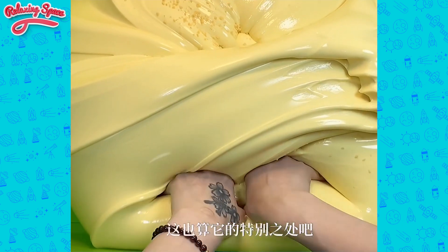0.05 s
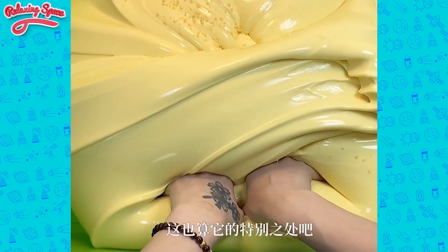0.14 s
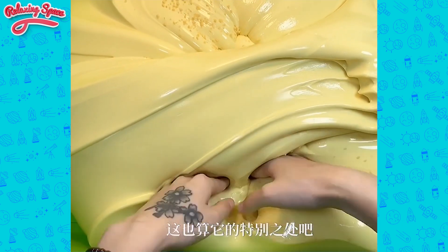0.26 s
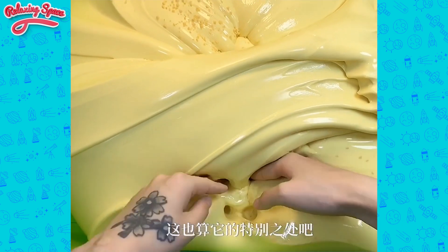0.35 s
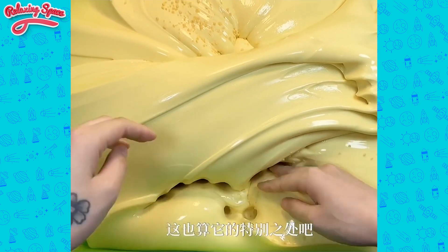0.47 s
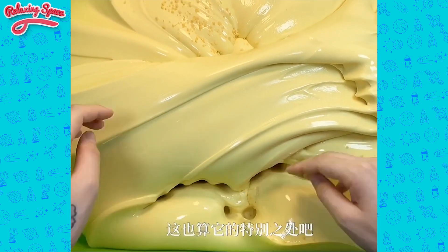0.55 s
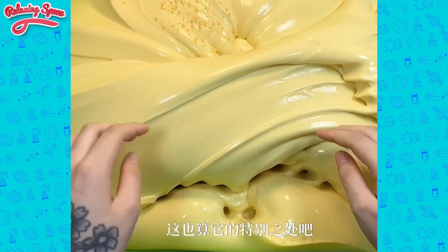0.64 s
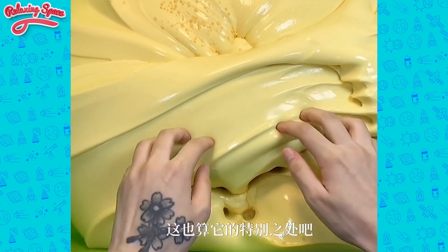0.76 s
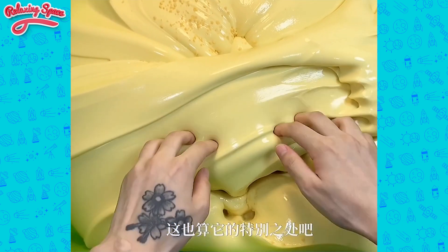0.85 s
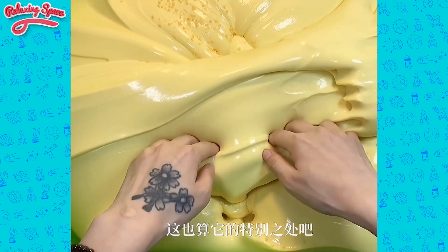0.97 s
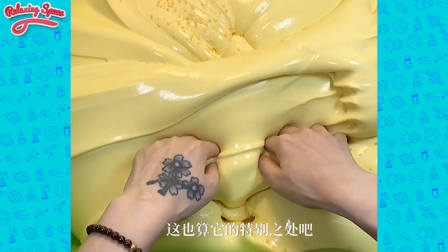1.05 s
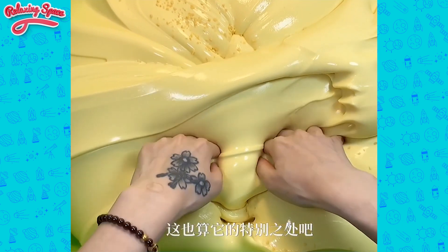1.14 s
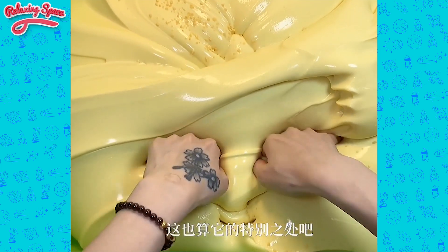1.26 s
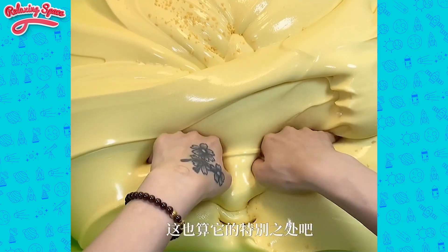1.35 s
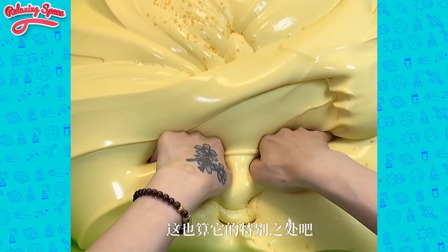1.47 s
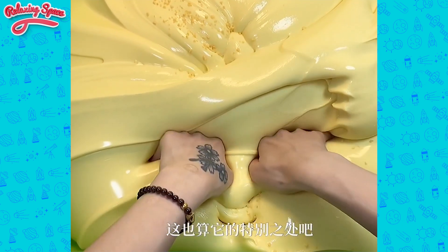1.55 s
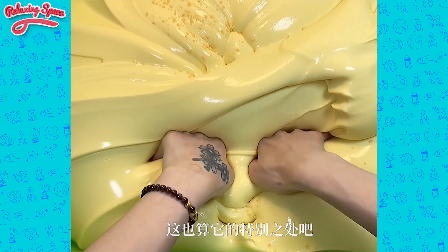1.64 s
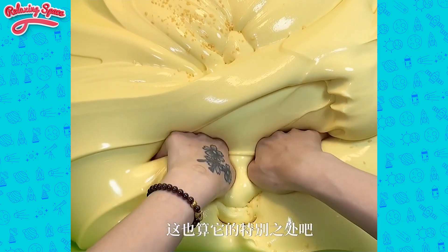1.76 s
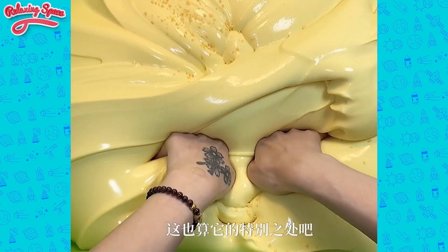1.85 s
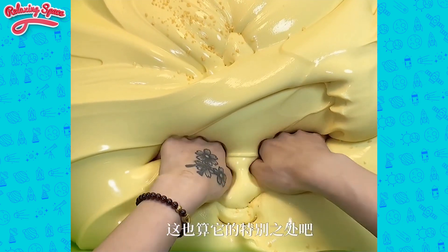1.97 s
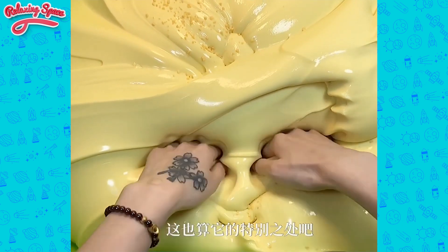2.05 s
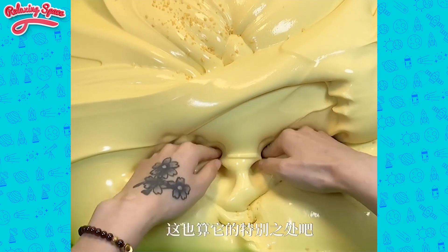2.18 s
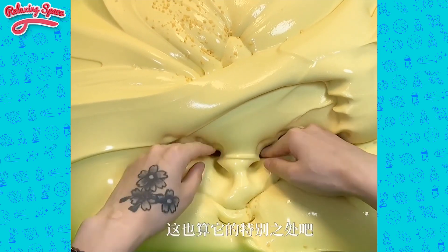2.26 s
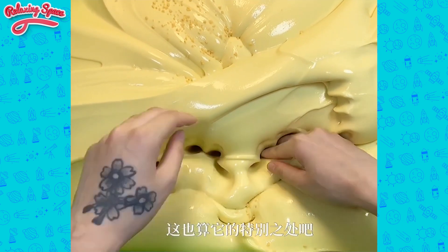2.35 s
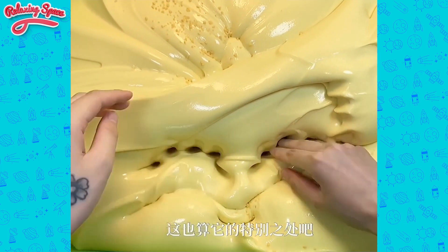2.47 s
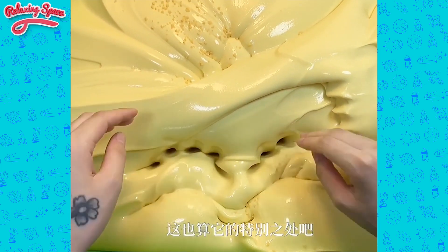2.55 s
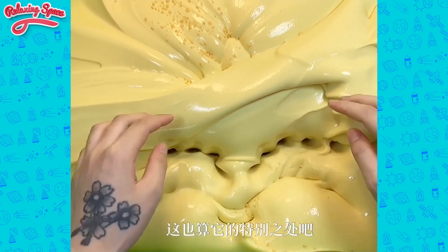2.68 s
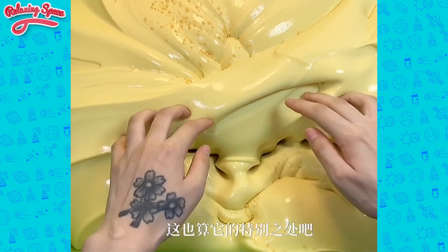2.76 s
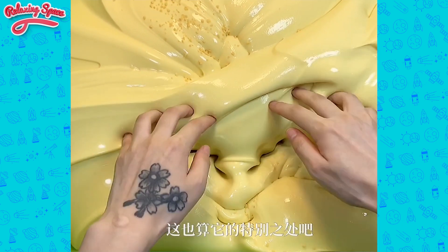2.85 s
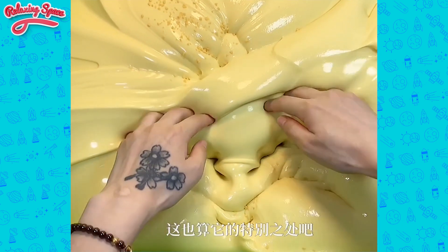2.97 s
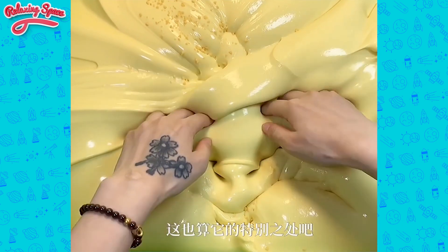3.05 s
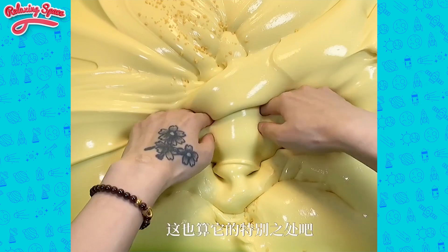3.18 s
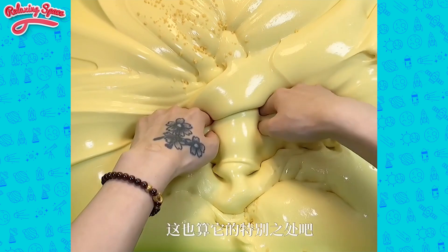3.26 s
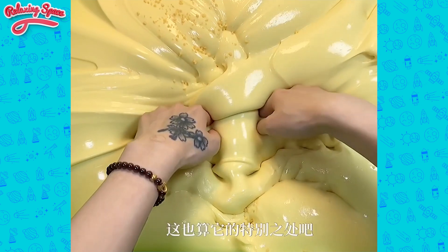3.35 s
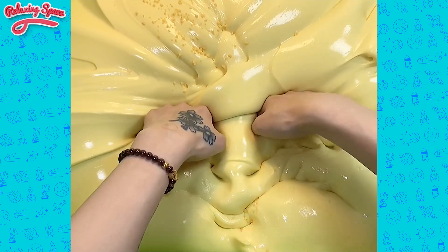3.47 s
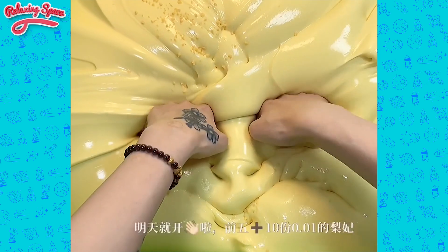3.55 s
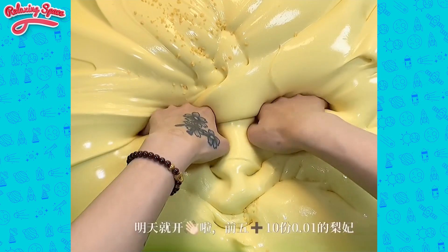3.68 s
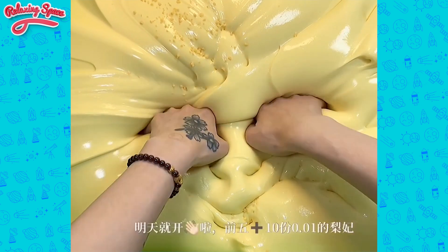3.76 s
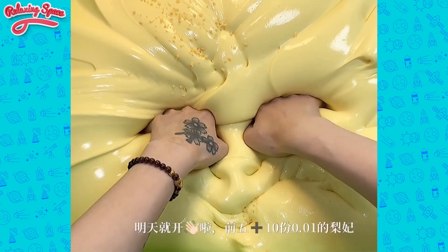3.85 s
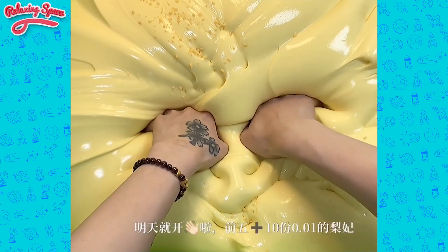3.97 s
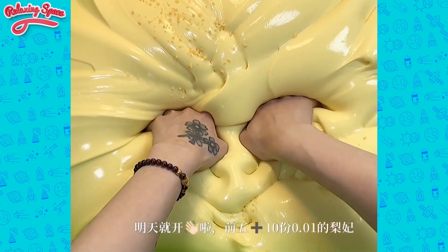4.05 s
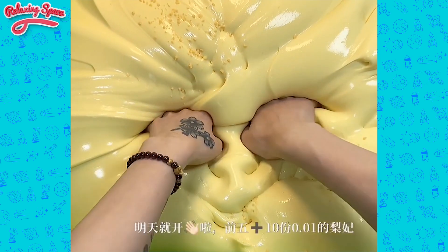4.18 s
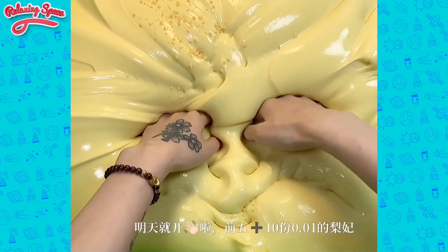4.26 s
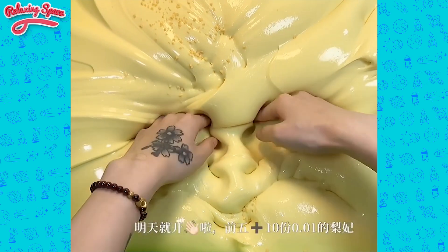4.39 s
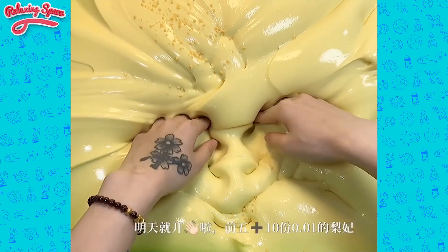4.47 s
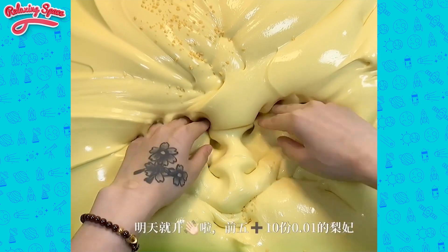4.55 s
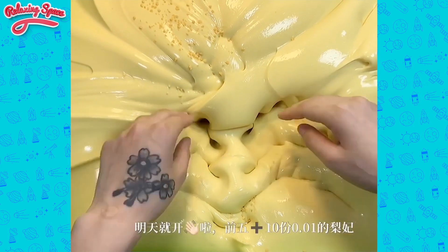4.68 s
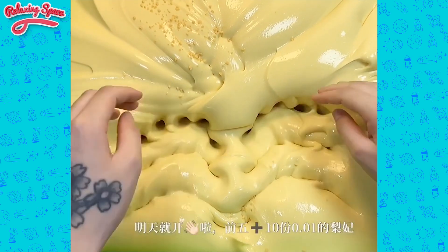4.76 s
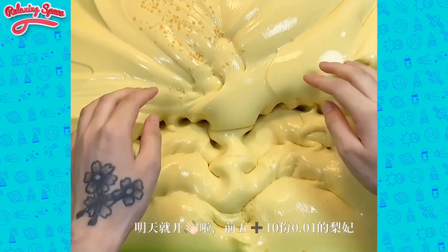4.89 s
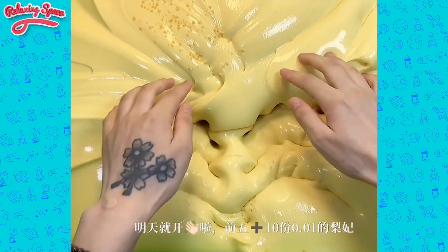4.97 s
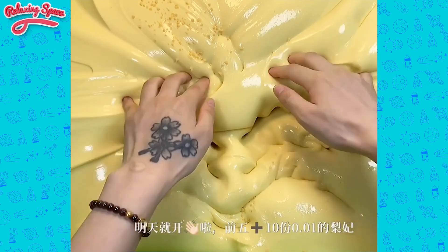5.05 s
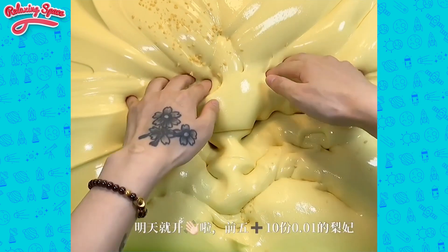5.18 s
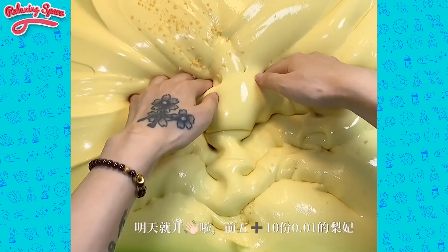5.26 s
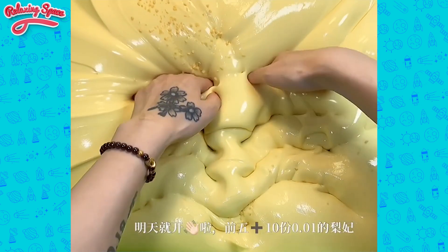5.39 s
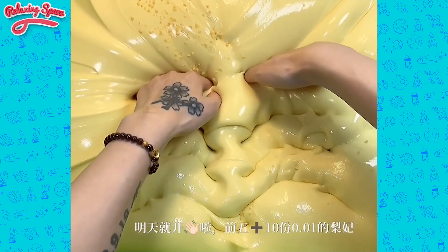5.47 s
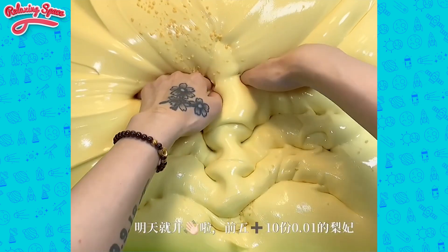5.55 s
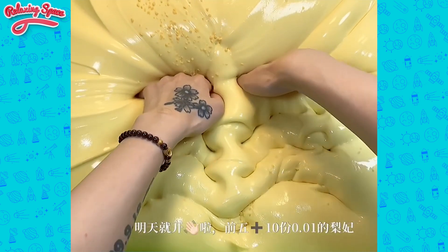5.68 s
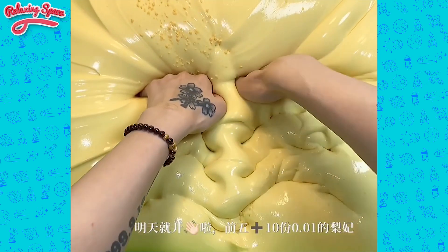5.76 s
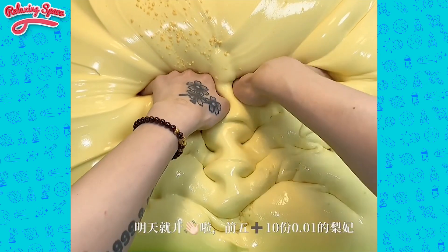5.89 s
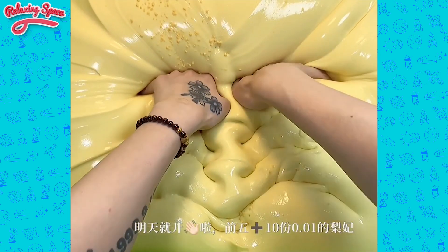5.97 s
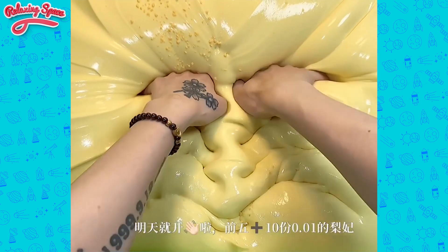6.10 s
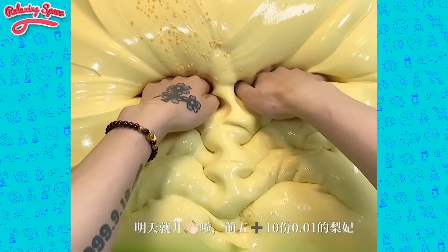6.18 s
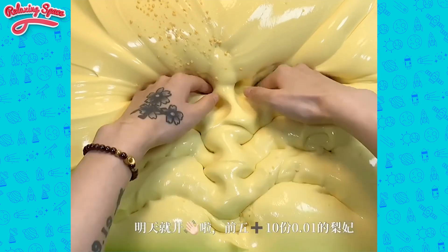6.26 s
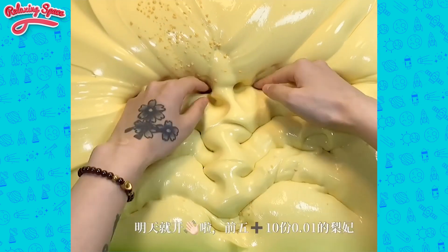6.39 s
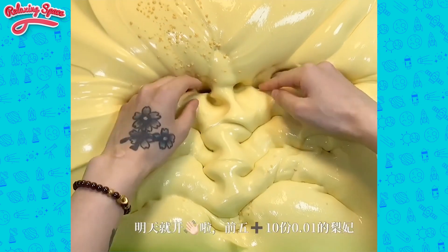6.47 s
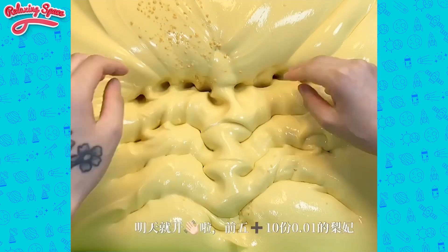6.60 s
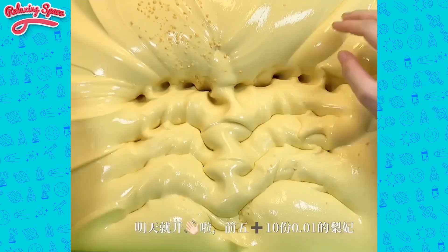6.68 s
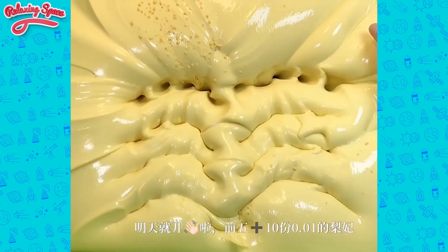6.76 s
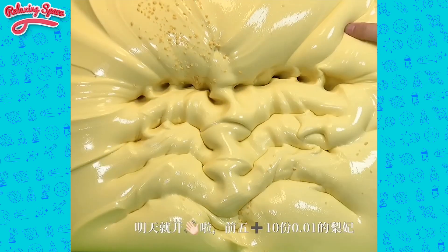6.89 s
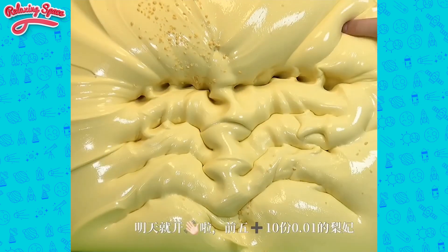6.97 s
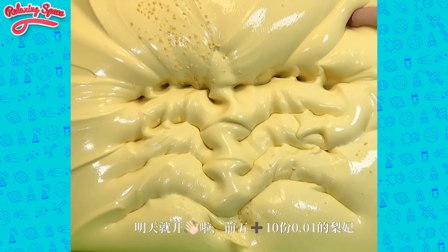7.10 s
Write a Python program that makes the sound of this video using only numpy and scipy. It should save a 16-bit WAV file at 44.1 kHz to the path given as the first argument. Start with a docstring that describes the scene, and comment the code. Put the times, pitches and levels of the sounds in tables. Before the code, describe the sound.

Hands press into thick slime and pull out four times, with sharp crackles, wet pops, squelches and soft low thuds.

```python
"""Hands in slime

Two hands press into thick slime and pull out, four times, in a small room. The film tears off the
fingers with bright cracks and a fizz; air pockets gulp and pop; the mass heaves and thuds on its tub.
A low rumble, a dull drone and a faint hiss fill the pauses. A small bird chirps far off."""
import sys
import numpy as np
from scipy import signal
from scipy.fft import rfft, irfft, next_fast_len
from scipy.io import wavfile
from scipy.ndimage import uniform_filter1d

SR = 44100
rng = np.random.default_rng(int(sys.argv[2]) if len(sys.argv) > 2 else 0)


def pcm_store(signal):
    """Save signal as 16-bit PCM."""
    levels = np.round(np.clip(np.atleast_2d(signal), -1, 1) * 32767)
    wavfile.write(sys.argv[1], SR, levels.astype(np.int16).T)


N = 314433

# film snaps: start_s, peak_db, pitch_hz, t60_s, pan_db (left positive), treble_db
FILM_SNAPS = [(0.1258, -22.5, 5040, 0.012, 6, -12.5), (0.182, -15.5, 5400, 0.025, 0, -5),
              (0.4419, -7.5, 3440, 0.037, 0, -12), (0.472, 4, 4420, 0.018, -6, 7),
              (0.508, -7, 5300, 0.011, 10, -13), (.5125, -4.5, 2720, 0.01, 2, -20),
              (0.5497, -11, 2770, 0.014, -5, 5.5), (0.663, -26, 3760, 0.011, 5, -13),
              (0.675, -7.5, 4060, 0.0019, 0, -22), (0.681, -3.5, 4600, 0.011, 4, -20),
              (1.024, -44.5, 2860, 0.035, -5, -18), (1.493, -33, 9970, .02, 5, -15),
              (2.2196, -19.5, 1845, 0.013, 3.5, -7), (2.2878, -2.5, 4280, 0.029, 0, 9),
              (2.3445, -10, 4140, 0.023, -1.5, -15), (2.3613, -3.5, 9200, 0.006, -12, -18),
              (2.4065, -10.5, 1810, 0.035, 9.5, -22), (2.421, -6.5, 5500, 0.01, -5, -11),
              (2.4936, -10, 1750, .03, -0.5, -25), (2.5074, -8.5, 3800, 0.027, 3, 6.5),
              (2.613, -8, 10800, 0.013, -2, 6), (2.6507, -18, 5270, 0.014, -6.5, -6.5),
              (2.734, -27, 1780, 0.069, 5, -20), (2.7567, -12, 1996, 0.057, 4, 2),
              (4.4732, 1, 4600, 0.015, -1, 8), (4.541, -15, 2830, 0.022, 2.5, -19),
              (4.586, -16.5, 3940, .012, 8.5, -12), (4.8708, 1, 5800, 0.013, 3, -35),
              (4.8825, -11.5, 5530, .02, -5.5, -16), (5.7645, -43.5, 2590, 0.03, 1.5, -0.5),
              (6.1748, -43.5, 10630, .015, 3, -6), (6.3088, -44.5, 3950, .018, 8, -9.5),
              (6.4043, -14, 10200, 0.074, -19.5, -5), (6.4199, -1, 10700, 0.014, 0.5, -13),
              (6.431, -12, 2320, .022, 11.5, 15), (6.486, -8.5, 5400, 0.019, 3.5, 0.5),
              (6.503, -9.5, 2450, 0.027, 3, -13), (6.6734, -22, 4630, 0.0083, -1, -22),
              (6.6906, -5, 4050, 0.037, 4, -28), (6.731, -25, 2970, .015, -2, -10),
              (6.755, -12, 9700, 0.027, 0.5, -23), (6.784, -19, 2440, 0.2, -1.5, -16),
              (7.022, -28, 3900, 0.011, 5.5, -16), (7.0966, -18, 2350, 0.0052, 2.5, -11),
              (7.1114, -31, 1870, 0.029, -3, -8)]
# air pockets open: start_s, peak_db, pitch_hz, t60_s
POCKET_POPS = [(.127, -24.5, 760, 0.036), (.182, -27, 753, .04), (.366, -29.5, 650, .03),
               (.443, -13.5, 778, 0.041), (.474, -22.5, 423, 0.024), (.502, -15.5, 987, 0.067),
               (.526, -14.5, 854, 0.026), (.552, -12.5, 465, .04), (0.635, -24.5, 1020, 0.056),
               (.659, -23.5, 1058, 0.083), (0.7, -26, 974, 0.027), (.725, -27, 520, 0.092),
               (0.751, -25, 423, 0.057), (1.492, -32, 314, 0.047), (2.221, -18.5, 1040, .029),
               (2.41, -23, 420, 0.077), (2.503, -12, 917, 0.049), (2.519, -13.5, 407, 0.056),
               (2.764, -13, 253, 0.038), (2.781, -16, 253, 0.046), (4.474, -15.5, 650, 0.092),
               (4.499, -12, 663, 0.022), (4.538, -18.5, 417, 0.052), (4.694, -20.5, 786, 0.022),
               (4.731, -27.5, 464, 0.046), (4.78, -34.5, 300, .04), (4.806, -23, 300, 0.069),
               (4.843, -20.5, 240, 0.041), (4.899, -9.5, 282, 0.033), (5.802, -17.5, 224, 0.018),
               (6.408, -12, 586, .065), (6.476, -14.5, 706, 0.029), (6.605, -18.5, 465, 0.03),
               (6.667, -15, 547, 0.044), (6.731, -10.5, 327, 0.063), (6.796, -9.5, 298, 0.037),
               (6.818, -15.5, 288, 0.016), (7.035, -20.5, 530, 0.078)]
# fingers tear free, or press in and stick: start_s, hold_s, smack_db, gulp_re_smack_db, fizz_re_smack_db
FINGER_TEARS = [(0.038, .01, -49, -11, -19), (0.13, 0.0067, -44, 1, -28), (0.212, 0.016, -51.5, -13, -15),
                (0.369, 0.0054, -50, 12, -17), (0.424, 0.025, -30.5, -5, -12.5),
                (0.448, 0.073, -25.5, 4, -2), (0.555, 0.015, -30, 5.5, -4), (0.641, 0.047, -32.5, -3, -6),
                (0.727, 0.016, -34, 0.5, -1.5), (2.219, 0.011, -40, 6.5, -2),
                (2.284, 0.0044, -38.5, 5, 10.5), (2.358, 0.011, -25.5, -1.5, -1),
                (2.42, 0.028, -29.5, 5.5, -2.5), (2.509, .01, -24.5, -1, -6), (2.65, .005, -43, -9.5, 8.5),
                (2.755, 0.0037, -35.5, 0, 3.5), (4.477, 0.011, -30.5, 9, 6), (4.525, 0.032, -25, 4, -8.5),
                (4.698, 0.049, -43.5, 8.5, 1), (4.77, 0.033, -35, 5.5, 5), (4.876, 0.0091, -28, 5.5, 1),
                (6.316, .01, -62, 15, 5.5), (6.389, .005, -46, 12, -10), (6.43, .005, -26, 0, 4),
                (6.478, 0.028, -24.5, 3.5, -6), (6.554, 0.018, -34, 4.5, -2), (6.672, 0.015, -33.5, 7.5, 3),
                (6.731, 0.016, -32.5, 6.5, 5.5), (6.789, 0.0048, -36, 1.5, 1), (7.12, .02, -39.5, 7, -34)]
FINGER_PRESSES = [(1.025, 0.045, -43, -27, -26), (7.025, 0.08, -43, 8, -9.5)]
# whole mass heaves: start_s, hold_s, gain_db
MASS_HEAVES = [(.0, .04, -58), (.135, 0.042, -60), (0.405, 0.18, -32.5), (0.646, 0.17, -36.5),
               (2.23, .35, -31.5), (2.77, .1, -33.5), (3.0, 0.011, -41.5), (4.532, 0.039, -18.5),
               (4.714, .1, -28.5), (4.848, 0.11, -23.5), (5.023, .01, -27.5), (5.17, 0.16, -41.5),
               (5.403, .01, -36), (6.378, 0.26, -34.5), (6.712, .14, -32.5), (7.05, 0.0087, -30),
               (7.12, .01, -23)]
# mass slumps: start_s, peak_db, pitch_hz, length_s
MASS_THUDS = [(0.397, -22.5, 96.4, 0.04), (1.482, -34, 68.5, 0.047), (2.486, -31.5, 85, 0.015),
              (2.776, -16.5, 250.3, 0.021), (3.772, -19.5, 78.4, 0.017), (4.952, -17.5, 92, 0.032),
              (5.009, -14.5, 44.3, 0.034), (5.055, -23, 57.3, 0.032), (5.305, -33.5, 72, 0.035),
              (5.381, -28, 55.9, 0.024), (5.8, -9, 166.6, 0.021), (7.102, -20, 40, 0.03)]
# bird calls: start_s, gain_db, rise_s, t60_s
BIRD_CALLS = [(.82, -48.5, 0.023, 0.39), (1.52, -51.5, 0.017, 0.25), (2.83, -45, 0.03, 0.27),
              (3.939, -48, 0.045, 0.29), (5.69, -48, 0.055, 0.21)]
# rumble envelope: time_s, gain_db
RUMBLE_GAIN = [(0.0, -45), (0.73, -46.5), (1.07, -49), (1.47, -42.5), (2.12, -49.5), (2.26, -45),
               (2.44, -43), (3.33, -48.5), (3.71, -49.5), (3.97, -52.5), (4.57, -48), (5.06, -31),
               (5.16, -40.5), (5.66, -41), (5.82, -47.5), (6.13, -60), (6.71, -41.5), (7.13, -50.5)]
# drone swells, mostly just before the hands pull out: start_s, hold_s, gain_db
DRONE_SWELLS = [(.0, .02, -46.5), (1.46, .02, -56), (1.824, 0.23, -47), (2.504, .2, -52),
                (4.068, 0.23, -47), (5.028, .02, -49), (5.698, 0.02, -56), (6.35, 0.6, -51.5),
                (7.097, .03, -45)]
# slime and background spectra: freq_hz, density_db
HEAVE_SPECTRUM = [(70, -8.5), (100, -2), (150, -2), (220, -5.5)]
GULP_SPECTRUM = [(200, -18), (300, -7), (420, 0), (770, -6), (960, -8), (1300, -9.5)]
SMACK_SPECTRUM = [(1100, -5.5), (1500, -9.5), (2400, -9), (3100, -12), (3900, -4.5), (5500, -9),
                  (6500, -20.5)]
FIZZ_SPECTRUM = [(5500, -2), (6300, -14.5), (7400, 3), (8500, -10), (10400, -4), (12700, -4), (15200, -9),
                 (16300, -12)]
RUMBLE_SPECTRUM = [(12, -50.5), (20, -32.5), (42, -3.5), (59, 0.5), (73, 0.5), (92, -14), (161, -17.5),
                   (220, -20.5), (290, -56.5), (480, -120)]
DRONE_SPECTRUM = [(120, -48), (200, -12.5), (259, -8.5), (291, -7.5), (335, -9), (415, -1.5), (591, -6),
                  (765, -18.5), (1230, -34), (1690, -27), (2600, -38), (3380, -77), (5720, -120)]
HISS_SPECTRUM = [(710, -30), (1200, 2), (1270, 0), (1380, -5), (1960, -6.5), (2840, -14.5), (4150, -10.5),
                 (8610, -14.5), (10600, -14), (15000, -14), (16200, -17)]
# narrow bands of tub, bird and background: centre_hz, width_hz, level_db
TUB_BANDS = [(154, 38, -5)]
CHIRP_BANDS = [(4180, 300, -13), (4790, 380, -7), (4970, 390, -6.5)]
PIP_BANDS = [(5840, 790, -14.5)]
RUMBLE_BANDS = [(58.7, 15, 0.5)]
DRONE_BANDS = [(154, 15, -13), (288, 6.9, -12), (420, 28, -12), (530, 13, -14.5), (601.6, 30, -7.5)]
# left-right likeness of the background: freq_hz, correlation
STEREO_CORRELATION = [(60, 0.99), (200, 0.65), (400, 0.93), (800, -0.16), (1500, -0.28), (3000, 0),
                      (8000, 0.26), (15000, 0.79)]


def film_cracks(lead_s=0.02, max_rise_s=0.0018):
    """Each crack has a very short noise lead-in, shorter if weak, then a sharp snap and a brief ring."""
    out = np.zeros((2, N))
    t = np.arange(4000) / SR - lead_s
    noises = rng.standard_normal((len(FILM_SNAPS), 3, len(t)))
    for (start_s, peak_db, hz, t60_s, pan_db, treble_db), noise in zip(FILM_SNAPS, noises):
        stereo = noise[0] + 0.55 * noise[1:]  # sides partly differ
        rise_s = max_rise_s * from_db(0.54 * min(peak_db, 0))
        burst = stereo * np.exp(np.minimum(t, 0) / rise_s) * decay(t, t60_s)
        burst[:, round(lead_s * SR)] = 3  # the snap
        pocket = unit_peak(ring(burst, hz, t60_s=16 / hz))
        body = unit_peak(bandpass(burst, 1500, 8640))
        treble = from_db(treble_db) * unit_peak(bandpass(burst, 7000, 14500))
        add(out, start_s + 0.0011 - lead_s, from_db(peak_db) * unit_peak(pocket + body + treble), pan_db)
    return out


def pocket_pops(glide_oct=-0.17, stumble_oct=0.15):
    """Damped sines; pitch stumbles and sinks as each wet pocket widens."""
    out = np.zeros((2, N))
    t = np.arange(6000) / SR
    for start_s, peak_db, hz, t60_s in POCKET_POPS:
        noise = rng.standard_normal(len(t))
        stumble = stumble_oct * unit_rms(uniform_filter1d(noise, round(SR / hz)))
        glide = glide_oct * np.minimum(3 * t / t60_s, 1)
        phase = 2 * np.pi * np.cumsum(hz * 2 ** (glide + stumble)) / SR
        rise_s = 0.45 / hz
        envelope = from_db(peak_db) * np.minimum(t / rise_s, 1) * decay(t - rise_s, t60_s)
        add(out, start_s, envelope * np.sin(phase), pan_db=0.53 * noise[0])
    return out


def peeling():
    """Slime tears off the skin: gulps, smacks with a few larger sticky snaps, fine fizz."""
    def envelope(rise_db_per_s, fall_db_per_s, offsets=(0, 0)):
        """Tears plus presses; offsets weights the gulp and fizz columns."""
        tears, presses = np.transpose(FINGER_TEARS), np.transpose(FINGER_PRESSES)
        tearing = surges(*tears[:2], tears[2] + offsets @ tears[3:], rise_db_per_s, fall_db_per_s)
        pressing = surges(*presses[:2], presses[2] + offsets @ presses[3:], 2300, 215)
        return tearing + pressing

    gulp = grains(GULP_SPECTRUM, per_s=600, cycles=22, spread_db=2.5, clump_db=2.5, pan_db=0.4, tones=16)
    smack = grains(SMACK_SPECTRUM, per_s=4500, cycles=40, spread_db=2.8, clump_db=2.5, pan_db=2, tones=14)
    snaps = grains(SMACK_SPECTRUM, per_s=200, cycles=45, spread_db=3, clump_db=0.94, pan_db=1.2, tones=11)
    fizz = grains(FIZZ_SPECTRUM, per_s=9000, cycles=26, spread_db=3, clump_db=2.2, pan_db=6, tones=10)
    return (envelope(900, 300, offsets=(1, 0)) * gulp
            + envelope(400, 280) * (smack + from_db(-12.5) * snaps)
            + envelope(330, 320, offsets=(0, 1)) * fizz)


def heaving():
    """The whole mass heaves; the tub booms under it."""
    mass = grains(HEAVE_SPECTRUM, per_s=150, cycles=13, spread_db=1.4, clump_db=1.2, pan_db=0.9, tones=6)
    envelope = surges(*np.transpose(MASS_HEAVES), rise_db_per_s=600, fall_db_per_s=200)
    return envelope * (from_db(-3.5) * mass + narrow_noise(TUB_BANDS))


def thuds(drop_oct=1.79, sag_oct=0.2):
    """The soft mass slumps on its tub: a few cycles, falling fast in pitch, then a dead stop."""
    out = np.zeros((2, N))
    for start_s, peak_db, hz, length_s in MASS_THUDS:
        progress = np.linspace(0, 1, round(length_s * SR))
        bend_oct = drop_oct * np.exp(-progress / 0.14) - sag_oct * progress
        phase = 2 * np.pi * np.cumsum(hz * 2 ** bend_oct) / SR
        add(out, start_s, from_db(peak_db) * np.sin(phase) * np.sin(np.pi * progress ** 0.83), pan_db=0)
    return out


def room_echoes(x, t60_s=0.2, wall_cut_hz=9000):
    """Eight feedback delays a side, duller on every round."""
    size = next_fast_len(N + SR)
    hz = np.arange(size // 2 + 1) * SR / size
    response = np.zeros((2, len(hz)), complex)
    for k, lag_s in enumerate(rng.uniform(0.006, 0.03, 16)):
        walls = decay(lag_s, t60_s) / (1 + 1j * hz / wall_cut_hz) ** (lag_s / 0.06)
        loop = walls * np.exp(-2j * np.pi * hz * lag_s)
        response[k % 2] += loop / (1 - loop) * (-1) ** (k // 2)
    return irfft(response * rfft(x.mean(0), size), size)[:, :N]


def far_bird(pip_delay_s=0.01, pip_half_s=0.026):
    """Each chirp opens on a high pip; distance smears it into a narrow, fading hiss."""
    t, chirps, pips = np.arange(N) / SR, 0, 0
    for start_s, gain_db, rise_s, t60_s in BIRD_CALLS:
        age_s = t - start_s
        chirps += from_db(gain_db) * np.clip(age_s / rise_s, 0, 1) * decay(age_s - rise_s, t60_s)
        pips += from_db(gain_db) * np.clip(1 - abs(age_s - pip_delay_s) / pip_half_s, 0, 1)
    return chirps * narrow_noise(CHIRP_BANDS) + pips * narrow_noise(PIP_BANDS)


def rumble():
    """Low noise around a wavering core."""
    gain_db = np.interp(np.arange(N) / SR, *np.transpose(RUMBLE_GAIN))
    broad = from_db(1) * broad_noise(RUMBLE_SPECTRUM, flicker_db=1.2, bands=8)
    return from_db(gain_db) * (broad + narrow_noise(RUMBLE_BANDS))


def drone(rest_gain_db=-60):
    """Dull, swelling noise with a few hollow tones."""
    swells = surges(*np.transpose(DRONE_SWELLS), rise_db_per_s=60, fall_db_per_s=70)
    broad = from_db(-1.5) * broad_noise(DRONE_SPECTRUM, flicker_db=3.5, bands=11)
    return (from_db(rest_gain_db) + swells) * (broad + narrow_noise(DRONE_BANDS))


def hiss(level_db=-65.5):
    """Faint, nearly steady high noise."""
    return from_db(level_db) * broad_noise(HISS_SPECTRUM, flicker_db=0.56, bands=8)


def grains(spectrum, per_s, cycles, spread_db, clump_db, pan_db, tones):
    """Tiny pockets burst at random under each hand and ring down 60 dB in `cycles`; rms 1."""
    out = np.zeros((2, N))
    pitches_hz = np.geomspace(spectrum[0][0], spectrum[-1][0], tones)
    clumps = from_db(clump_db * drift(rate_hz=25))
    for hand in (1, -1):
        sizes = from_db(spread_db * np.minimum(rng.exponential(1, N), 3)) * rng.choice([-1, 1], N)
        clicks = sizes * (rng.random(N) < per_s / SR) * clumps
        tone = rng.integers(0, tones, N)
        # times hz: ring energy goes as 1 / hz, band energy as hz
        rings = sum(ring(clicks * (tone == k), hz, cycles / hz) * hz * from_db(at_hz(spectrum, hz))
                    for k, hz in enumerate(pitches_hz))
        add(out, 0.001, rings, hand * pan_db)
    return unit_rms(out)


def broad_noise(spectrum, flicker_db, bands):
    """Stereo noise bands, each with its own level, flicker and correlation; rms 1."""
    out, edges_hz = 0, np.geomspace(spectrum[0][0], spectrum[-1][0], bands + 1)
    white = rng.standard_normal((2, 2, N))
    for k, (low_hz, high_hz) in enumerate(zip(edges_hz, edges_hz[1:])):
        mid, side = bandpass(white[k % 2], low_hz, high_hz)
        hz = np.sqrt(low_hz * high_hz)
        alike = at_hz(STEREO_CORRELATION, hz)
        gain = from_db(at_hz(spectrum, hz) + flicker_db * drift(rate_hz=9.4))
        out += gain * (np.sqrt(1 + alike) * mid + np.sqrt(1 - alike) * side * [[1], [-1]])
    return unit_rms(out)


def narrow_noise(bands):
    """Near-mono noise, twice through each resonance."""
    mid, left, right = rng.standard_normal((3, N))
    out, noise = 0, mid + 0.22 * np.array([left, right])
    for hz, width_hz, level_db in bands:
        t60_s = np.log(1000) / np.pi / width_hz
        out += from_db(level_db) * unit_rms(ring(ring(noise, hz, t60_s), hz, t60_s))
    return out


def surges(start_s, hold_s, gain_db, rise_db_per_s, fall_db_per_s, hop=80):
    """Gain of events that climb until start_s, hold and sink; powers add."""
    t = np.arange(0, N + hop, hop) / SR - start_s[:, None]
    rise_db = rise_db_per_s * np.minimum(t, 0)
    fall_db = fall_db_per_s * np.maximum(t - hold_s[:, None], 0)
    power = (from_db(gain_db[:, None] + rise_db - fall_db) ** 2).sum(0)
    return np.interp(np.arange(N) / hop, np.arange(len(power)), np.sqrt(power))


def drift(rate_hz, hop=40):
    """Slow random wander, rms 1."""
    pole = np.exp(-2 * np.pi * rate_hz * hop / SR)
    slow = signal.lfilter([1], [1, -2 * pole, pole ** 2], rng.standard_normal(N // hop + 2002))[2000:]
    return np.interp(np.arange(N) / hop, np.arange(len(slow)), unit_rms(slow))


def add(out, start_s, sound, pan_db, max_lag_s=0.00027):
    """Mix in, louder and earlier on the nearer side."""
    lag_s = max_lag_s * np.tanh(pan_db / 7)
    for channel, side, piece in zip(out, (1, -1), sound * np.ones((2, 1))):
        at = max(round((start_s - side * lag_s / 2) * SR), 0)
        channel[at:at + len(piece)] += piece[:N - at] * from_db(side * pan_db / 2)


def ring(x, hz, t60_s):
    """Resonator: a unit click rings a unit sine."""
    radius, angle = decay(1 / SR, t60_s), 2 * np.pi * hz / SR
    return signal.lfilter([0, np.sin(angle)], [1, -2 * radius * np.cos(angle), radius ** 2], x + 1e-18)


def bandpass(x, low_hz, high_hz):
    return signal.sosfilt(signal.butter(2, [low_hz, high_hz], "band", fs=SR, output="sos"), x)


def at_hz(curve, hz):
    freqs_hz, values = np.transpose(curve)
    return np.interp(np.log(hz), np.log(freqs_hz), values)


def decay(t, t60_s):
    return from_db(-60 * np.maximum(t, 0) / t60_s)


def from_db(db):
    return 10 ** (np.asarray(db) / 20)


def unit_rms(x):
    return x / np.sqrt(np.mean(x ** 2) + 1e-20)


def unit_peak(x):
    return x / abs(x).max()


def scene(room_db=-16):
    """Close slime over the background; only cracks and pops feed the room."""
    snaps = film_cracks() + pocket_pops()
    background = rumble() + drone() + hiss()
    echoes = from_db(room_db) * room_echoes(snaps)
    return snaps + echoes + thuds() + heaving() + peeling() + far_bird() + background


def record(dry, cutoff_hz=16500):
    """Clip at full scale, then low-pass."""
    return signal.sosfilt(signal.cheby2(12, 60, cutoff_hz, fs=SR, output="sos"), np.clip(dry, -1, 1))


dry = scene()
out = record(dry)
pcm_store(out)
```